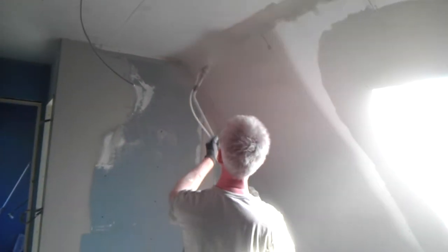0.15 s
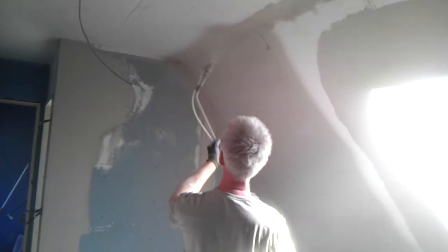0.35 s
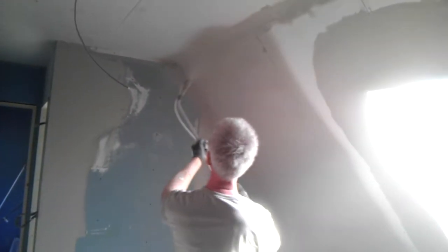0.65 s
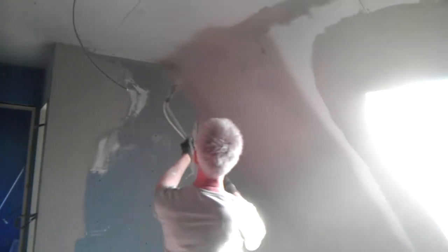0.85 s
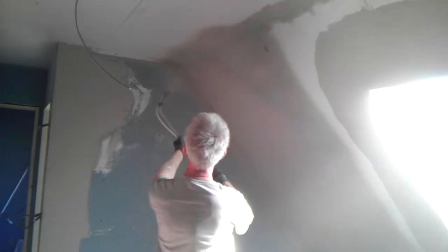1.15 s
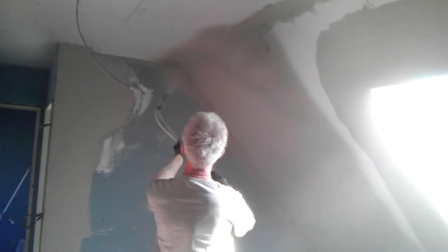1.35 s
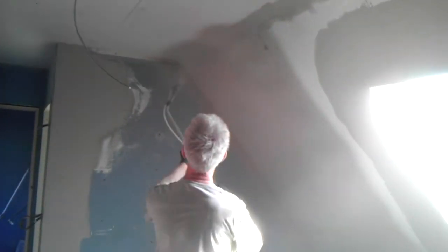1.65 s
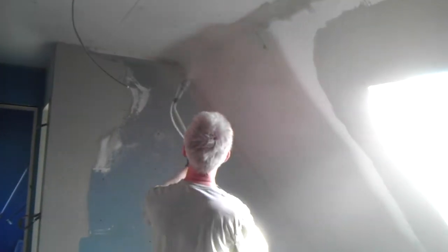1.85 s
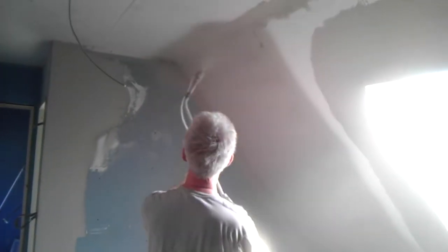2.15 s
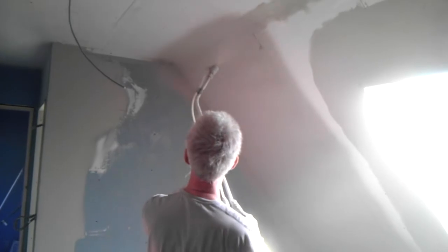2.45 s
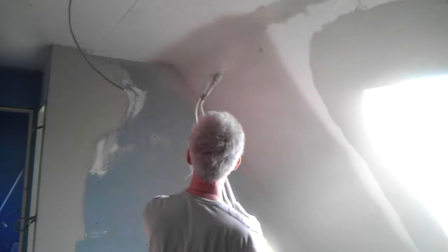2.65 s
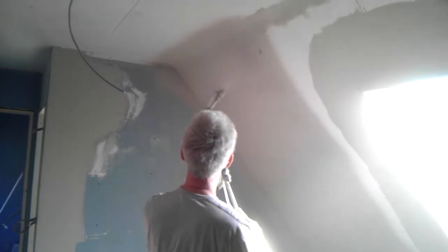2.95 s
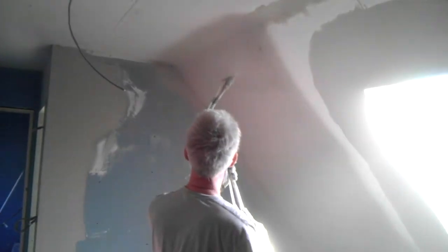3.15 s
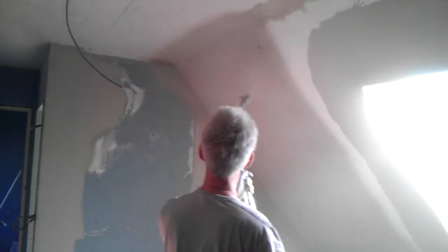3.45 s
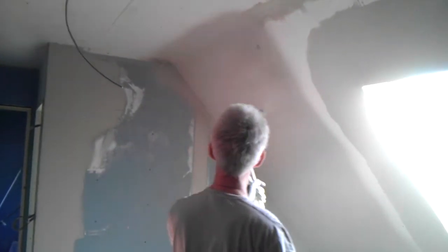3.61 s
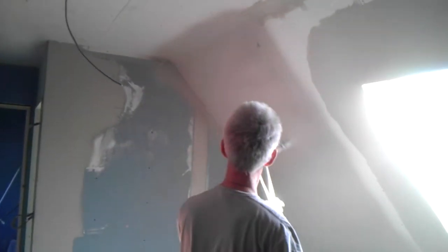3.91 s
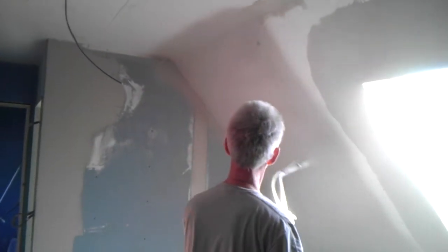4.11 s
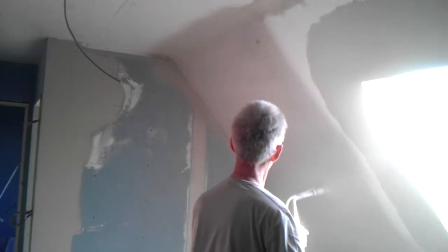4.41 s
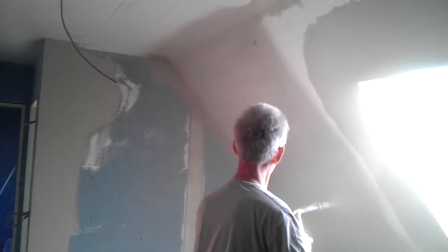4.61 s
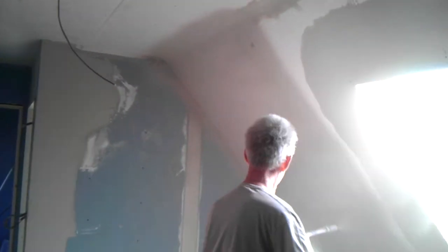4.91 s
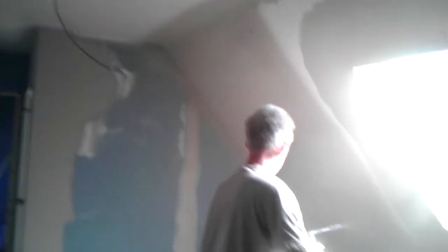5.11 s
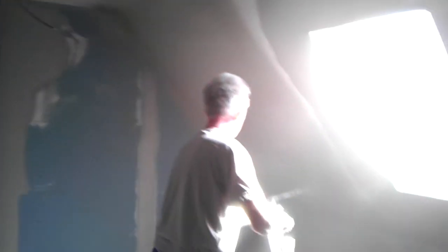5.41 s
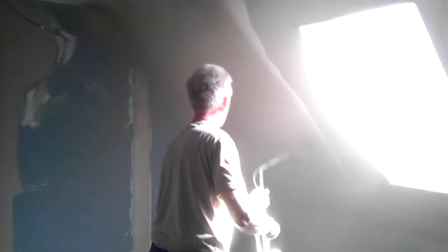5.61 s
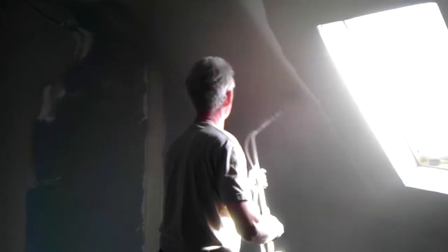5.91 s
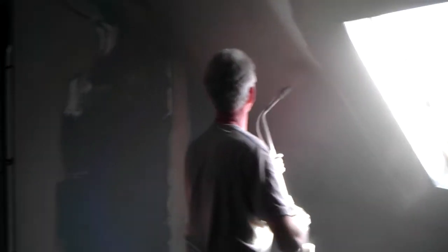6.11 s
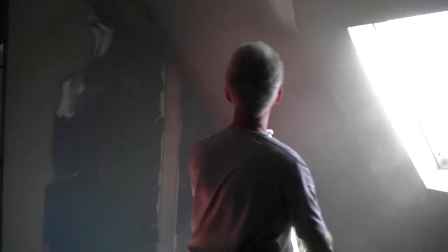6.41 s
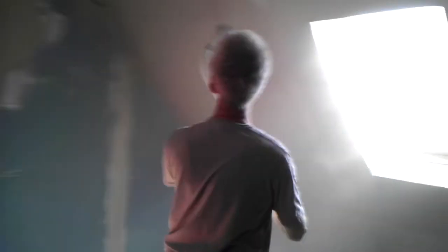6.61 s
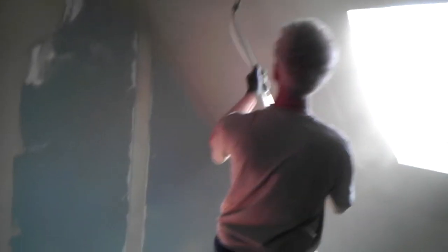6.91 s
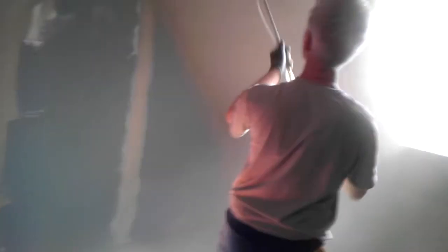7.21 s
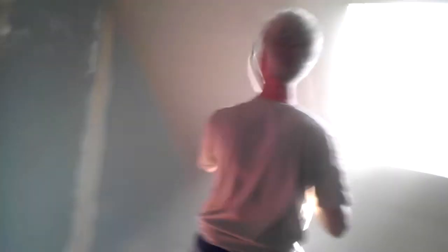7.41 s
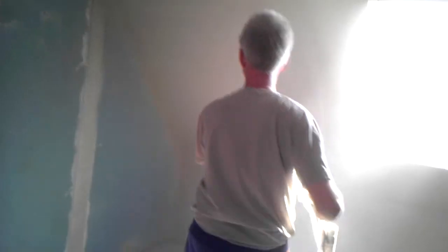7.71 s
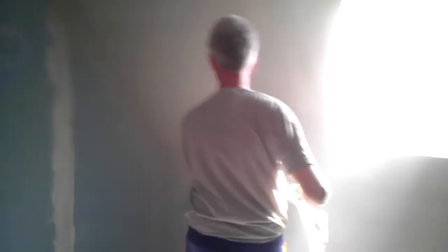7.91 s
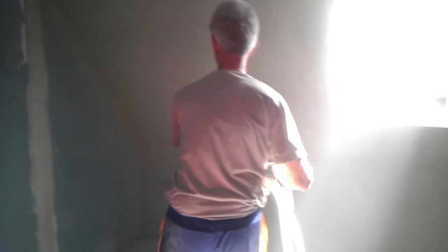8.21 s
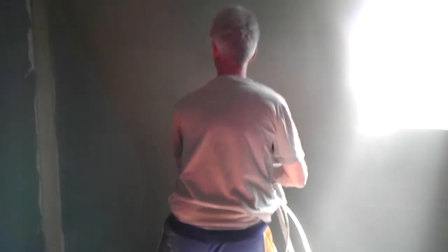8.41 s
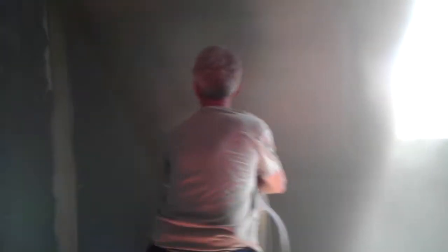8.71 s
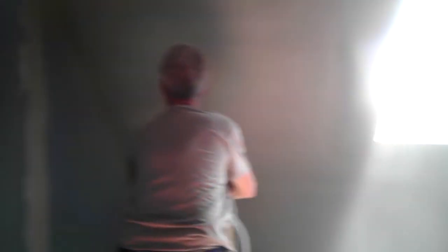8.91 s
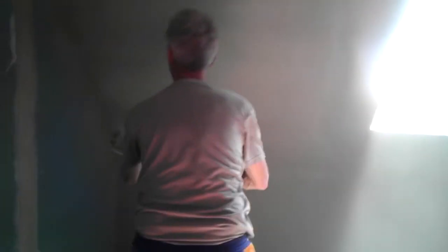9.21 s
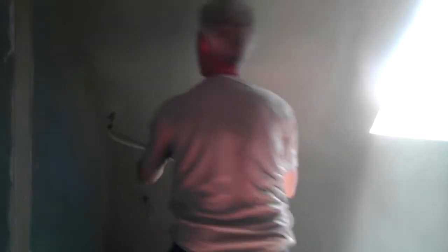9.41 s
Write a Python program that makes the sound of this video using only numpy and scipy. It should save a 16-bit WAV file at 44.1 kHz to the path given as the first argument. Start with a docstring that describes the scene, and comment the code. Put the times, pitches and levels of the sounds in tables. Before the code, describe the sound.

Continuous harsh spray noise, a bright hiss over a rough roar with a breathy wavering whistle and a few faint low thuds.

```python
"""Plaster spraying in a small bare room

A worker sprays plaster onto a ceiling with an air lance, a phone just behind him. Compressed air hisses
and sputters as shaped noise; the spray roars on the wall as noise with narrow resonances, and a whistle breathes.
Near reflections are faint copies with wandering delays. Short low thuds of overloaded peaks, as the air surges,
are drawn as noise dying through low modes. The phone widens its two ports with a short echo, clips and cuts the top."""
import sys
import numpy as np
from scipy.fft import rfft, irfft, next_fast_len
from scipy.io import wavfile
from scipy.ndimage import uniform_filter1d, minimum_filter1d

SR = 44100
rng = np.random.default_rng(int(sys.argv[2]) if len(sys.argv) > 2 else 0)


def master_out(mix):
    """Clip the mix to full scale and print it as 16-bit PCM to the path in sys.argv[1]."""
    frames = np.transpose(np.atleast_2d(mix))
    ceiling = np.clip(frames, -1, 1)
    pcm = np.round(ceiling * 32767).astype(np.int16)
    wavfile.write(sys.argv[1], SR, pcm)


N = 421155
SIZE = 2 * next_fast_len(N // 2 + 2000)  # transform length in samples, with room for tails
TIME, FREQ = np.arange(N) / SR, np.fft.rfftfreq(SIZE, 1 / SR)  # s, Hz
SIDES = np.array([[1], [-1]])  # left and right port


def undb(db):
    """Decibels to gain."""
    return 10 ** (np.asarray(db) / 20)


def shape(table):
    """Points joined by straight lines on a log-frequency axis."""
    hz, value = np.transpose(table)
    return np.interp(np.log(FREQ + 1), np.log(hz), value)


def curve(table):
    """Points joined by straight lines in time."""
    return np.interp(TIME, *np.transpose(table))


def resonance(hz, width):
    """Response of one damped mode, 1 at its centre."""
    return 1j * FREQ * width / (hz ** 2 - FREQ ** 2 + 1j * FREQ * width)


def below(hz, order):
    """A smooth step from 1 under hz to 0 above."""
    return 1 / (1 + (FREQ / hz) ** order)


def through(x, response):
    """Filter a sound by a frequency response."""
    return irfft(rfft(x, SIZE) * response, SIZE)[..., :N]


def walk(rate):
    """Random levels held 1 / rate s and slewed twice; spread near 1."""
    hold = int(SR / rate)
    steps = np.repeat(rng.standard_normal(N // hold + 1), hold)
    slewed = uniform_filter1d(uniform_filter1d(steps, hold), hold)
    return 1.3 * slewed[:N]  # makes up for the spread lost in slewing


def turbulence(response):
    """Coloured noise as it reaches the two ports from all the walls; its middle has rms 1."""
    # Likeness of the room's sound at the two ports. Each row: frequency in Hz, correlation.
    likeness = [(900, 0.83), (1150, 0.39), (1450, 0.19), (1700, 0.24), (2000, 0.45), (2500, 0.54),
                (3000, 0.36), (6000, 0.42), (10000, 0.3), (15000, 0.01)]
    # The ports' own resonances. Each row: frequency in Hz, left minus right in dB.
    port_balance = [(1000, 0.0), (2500, 1.1), (4000, 3.5), (5150, 8), (6300, 0), (7200, -2), (8300, -7),
                    (11000, -7), (13000, -9), (15000, 1)]
    alike = np.clip(shape(likeness), -.95, .95)
    mid, side = rfft(rng.standard_normal((2, SIZE)))
    ports = mid * np.sqrt(1 + alike) + SIDES * side * np.sqrt(1 - alike)
    # the two shares of power add up to 1 at every frequency
    share = 1 / np.sqrt(1 + undb(-SIDES * shape(port_balance)) ** 2)
    sound = irfft(ports * share * response, SIZE)[:, :N]
    return sound / np.std(sound.mean(axis=0))


def nozzle(gulp_db, air_supply_db=-14.5, surge_db=0.86, surge_rate=22, pump_db=-0.08,
           beam_db=0.56, beam_hz=7200, beam_follow=0.18, beam_pump_db=0.37, flutter_db=0.9, sway_db=.5):
    """The air jet: a broad hiss near 5 kHz that surges irregularly, and top treble beamed where the lance points."""
    # Spectrum of the escaping air. Each row: frequency in Hz, density in dB per Hz before levelling.
    hiss_spectrum = [(2800, -58), (3400, -16.5), (3950, -5.5), (4650, -1.5), (5150, 1.8), (5800, -3.5),
                     (6500, -10), (7200, -15.5), (8700, -13.5), (10000, -16.5), (12000, -25), (14000, -33),
                     (15500, -53)]
    # Beamed top treble as the lance is swept. Each row: time in seconds, level in dB before beam_db.
    beam_level = [(0.0, -25.5), (0.75, -23.5), (1.04, -23.5), (1.34, -26), (1.94, -23), (2.09, -26),
                  (3.13, -25), (4.63, -27.3), (4.92, -23.5), (5.07, -26), (8.21, -26.5), (8.51, -29),
                  (9.1, -23), (9.55, -24.3)]
    # Lean of the hiss between the ports. Each row: time in seconds, left minus right in dB.
    lean = [(0, 0.5), (1.6, 0.7), (4, .4), (7.1, 0.9), (8.2, 0.2), (9.55, -0.3)]
    colour, broad = undb(shape(hiss_spectrum)), below(beam_hz, order=20)
    air_db = gulp_db + surge_db * walk(rate=surge_rate)
    # surges of the air reach the top treble too; the narrow beam sways with the hand and flutters by itself
    top_db = curve(beam_level) + beam_db + beam_follow * air_db + beam_pump_db * pump()
    top_db = top_db + sway_db * walk(rate=9.9) + flutter_db * walk(rate=40)
    hiss_db = air_supply_db + air_db + pump_db * pump()
    hiss = turbulence(colour * np.sqrt(broad)) * undb(hiss_db)
    top = turbulence(colour * np.sqrt(1 - broad)) * undb(top_db)
    return (hiss + top) * undb(SIDES * curve(lean) / 2)


def spray(gulp_db, roar_db=.5, pump_db=0.27, waver_db=0.9,
          hollow_db=0.4, hollow_follow=0.48, hollow_waver_db=0.75, hollow_hz=960,
          lowest_hz=480, lowest_follow=1.5, lowest_waver_db=3.4, lowest_db=0):
    """The plaster-laden stream hits the wall: a bright roar over a hollow low one whose lowest band comes and goes."""
    # Spectrum of the roar. Each row: frequency in Hz, density in dB per Hz before rings and levelling.
    roar_spectrum = [(120, -69.5), (280, -35), (510, -33), (760, -16), (1050, -14.5), (1330, -6),
                     (1600, -7.5), (2100, -6), (2400, -7), (2600, -11), (2700, -13), (3200, -12.5),
                     (4500, -19)]
    # Narrow resonances, the lowest from the room. Each row: frequency in Hz, width in Hz, lift in dB.
    rings = [(178, 12, 12.5), (233, 6.9, 11), (452, 5.1, 8), (857, 67, 5), (1296, 280, 2), (1692, 35, 4.5)]
    # Bright roar as the lance is swept over the wall. Each row: time in seconds, level in dB before roar_db.
    roar_level = [(0.0, -20.5), (2.98, -24.5), (3.13, -21.0), (3.28, -23), (3.58, -20.5), (3.88, -24.5),
                  (4.03, -21.5), (4.92, -21.5), (5.82, -25.5), (5.97, -22), (6.42, -24), (6.57, -20.7),
                  (6.86, -24.5), (8.36, -24), (9.1, -20.0), (9.55, -23)]
    # Hollow low roar. Each row: time in seconds, level in dB before hollow_db.
    hollow_level = [(0.0, -34.5), (2.39, -41.5), (3.58, -35), (3.73, -39.5), (4.63, -37), (4.92, -35.5),
                    (5.22, -41.5), (5.37, -35.5), (5.67, -40), (7.61, -36), (7.91, -39.5), (9.55, -32.1)]
    feed_db = gulp_db + pump_db * pump() + waver_db * walk(rate=13)
    level_db = curve(roar_level) + feed_db
    low_db = curve(hollow_level) + hollow_follow * feed_db + hollow_waver_db * walk(rate=14)
    ring_db = sum(lift_db * abs(resonance(hz, width)) ** 2 for hz, width, lift_db in rings)
    in_range = FREQ < roar_spectrum[-1][0]
    colour = undb(shape(roar_spectrum) + ring_db) * in_range
    low = below(hollow_hz, order=16)
    bright = turbulence(colour * np.sqrt(1 - low)) * undb(level_db + roar_db)
    hollow = turbulence(colour * np.sqrt(low)) * undb(low_db + hollow_db)
    # the lowest band comes and goes, as the phone overloads on peaks and mutes faint lows between;
    # drawn as a gain that follows the feed and wavers at random
    lowest = through(hollow, below(lowest_hz, order=10))
    lowest_gain = undb(lowest_db + lowest_follow * feed_db + lowest_waver_db * walk(rate=7))
    return bright + hollow + lowest * (lowest_gain - 1)


def whistle(gulp_db, hz=2555, width_hz=175, whistle_db=-1.5, follow=.7, waver_db=1.0):
    """A cavity in the nozzle sings breathily and unsteadily: noise through one mode, passed twice."""
    # Breathy whistle. Each row: time in seconds, level in dB before whistle_db.
    whistle_level = [(0.0, -30), (1.34, -30), (1.49, -27), (1.94, -34.5), (5.07, -28), (5.22, -42),
                     (5.37, -26), (5.82, -38), (5.97, -30.5), (7.46, -34.5), (8.21, -26), (8.65, -36),
                     (9.25, -28), (9.55, -28)]
    level_db = curve(whistle_level) + whistle_db + follow * gulp_db + waver_db * walk(rate=12)
    return turbulence(resonance(hz, width_hz) ** 2) * undb(level_db)


def flow():
    """Changes of the hiss and of the roar in dB: each gulp rises and falls as a bell."""
    # The strongest gulps of the jet, spitting (+) or choking (-). Each row: middle in seconds,
    # length at half height in seconds, change of the hiss in dB, change of the roar in dB.
    gulps = [(0.254, 0.035, 3.5, 1.5), (.30, .03, -3.5, -0.5), (0.457, 0.058, -1.7, -1.5),
             (1.077, .05, 2.5, 2), (1.474, 0.13, -2.3, 2), (1.878, 0.067, 1.5, 2.5), (2.117, .04, -5, -1),
             (2.823, .03, 3.5, 3), (3.82, 0.22, -1, 0), (4.594, 0.13, 0.5, -3), (4.73, 0.067, -3.5, -2.5),
             (5.02, .05, 2.7, 0.7), (5.185, 0.12, -1.5, -2.5), (6.743, 0.044, -4, -0.5),
             (7.15, 0.099, -2, -1.5), (7.216, .05, 4, 1), (7.902, 0.037, 1, 1.5), (7.975, 0.056, -0.5, -4),
             (8.43, .03, -5, 1.5), (8.51, .03, 2, -0.5), (8.65, 0.026, -3.5, -2.4)]
    changes = 0
    for middle, length, hiss_db, roar_db in gulps:
        bell = 2 ** -(2 * (TIME - middle) / length) ** 2
        changes = changes + np.outer([hiss_db, roar_db], bell)
    return changes


def pump(strokes_hz=2.375, crest_s=0.2):
    """The gentle swell of the plaster feed, a cosine from -1 to 1 with one crest at crest_s."""
    return np.cos(2 * np.pi * strokes_hz * (TIME - crest_s))


def near_walls(x, first_s=.0014, last_s=.015, sway_s=.00038, sway_rate=2.2,
               strength=.2, dull_hz=13000, count=10):
    """Ceiling, slope and corner return early, duller copies; paths shift as the lance moves: a wandering comb."""
    out, bounced = x, strength * through(x, below(dull_hz, order=2))
    for delay in np.geomspace(first_s, last_s, count):
        when = TIME - delay - sway_s * walk(sway_rate)
        out = out + np.array([np.interp(when, TIME, port, left=0) for port in bounced])
    return out / np.sqrt(1 + count * strength ** 2 / 2)


def overload_thuds(low_hz=110, high_hz=600):
    """Short low thuds of overloaded peaks as the air surges, drawn as noise dying through low modes."""
    # Low thuds. Each row: start in seconds, level in dB before rise and decay, rise time constant
    # in seconds, time to die by 60 dB in seconds.
    thuds = [(3.19, -46, .01, 0.29), (4.017, -30, .003, 0.041), (4.945, -35, .01, .2),
             (5.0, -41, .005, .09), (5.068, -39, .003, 0.045), (7.135, -43, .01, 0.22),
             (7.895, -45, .01, 0.29), (8.47, -41, .015, 0.21), (8.545, -28.5, .015, .25),
             (8.595, -32.5, 0.011, .45)]
    # Low modes that colour a thud. Each row: frequency in Hz, width in Hz, level in dB relative to the others.
    modes = [(135, 30, -4), (182, 18, 6), (235, 31, 10), (290, 70, 3), (390, 90, -12)]
    level = np.zeros(N)
    for start, db, rise, decay in thuds:
        age = np.maximum(TIME - start, 0)
        level += undb(db) * (1 - np.exp(-age / rise)) * np.exp(-np.log(1000) * age / decay)
    colour = sum(undb(db) * resonance(hz, width) for hz, width, db in modes)
    colour = colour * below(high_hz, order=4) * (1 - below(low_hz, order=6))
    colour = colour / np.sqrt(np.mean(abs(colour) ** 2))  # keeps the power of the noise
    return through(level * rng.standard_normal(N), colour)


def scene(sputter_db=0.48):
    """Lumps of plaster choke the jet unevenly, shaking hiss and roar together; low thuds are added."""
    hiss_db, roar_db = flow()
    jet = nozzle(hiss_db) + spray(roar_db) + whistle(roar_db)
    sputtering = jet * undb(sputter_db * walk(rate=36))
    return near_walls(sputtering) + overload_thuds()


def limiter(x, ceiling=1.24, size=60):
    """Turn each channel down for a few milliseconds around its highest peaks; size in samples."""
    gain = np.minimum(1, ceiling / (abs(x) + 1e-9))
    held = minimum_filter1d(gain, size, axis=1)
    return x * uniform_filter1d(held, size, axis=1)


def record(dry, widen=0.58, widen_s=.01, widen_hz=11000, top_hz=15600):
    """The phone adds a dulled 10 ms echo to the difference of its ports, limits and clips peaks, cuts the top."""
    mid, side = dry.mean(axis=0), (dry[0] - dry[1]) / 2
    echo = widen * np.exp(-2j * np.pi * FREQ * widen_s) / (1 + 1j * FREQ / widen_hz)
    wide = mid + SIDES * through(side, 1 + echo)
    clipped = np.clip(limiter(wide), -1, 1)
    return through(clipped, FREQ < top_hz)


dry = scene()
out = record(dry)
master_out(out)
```